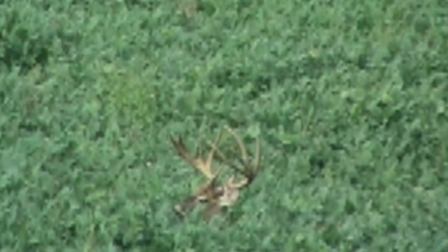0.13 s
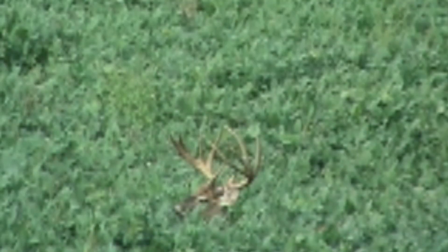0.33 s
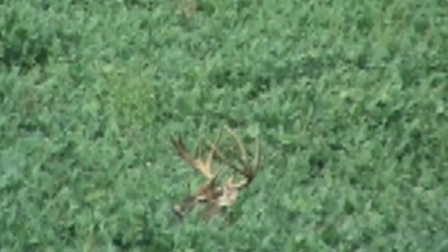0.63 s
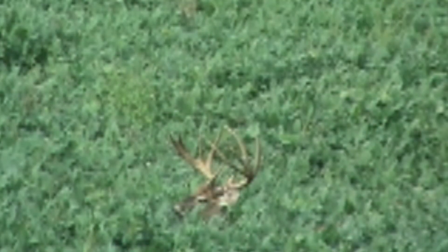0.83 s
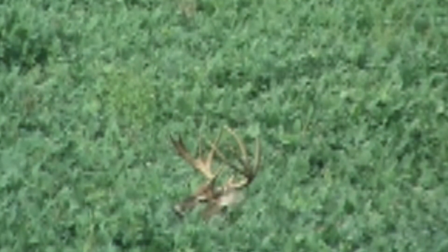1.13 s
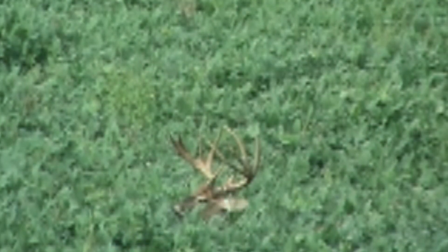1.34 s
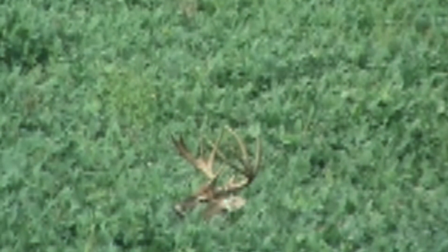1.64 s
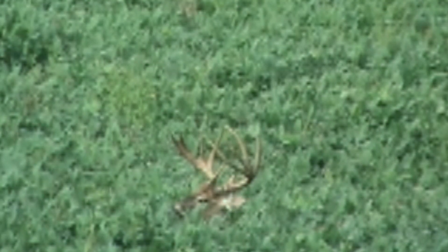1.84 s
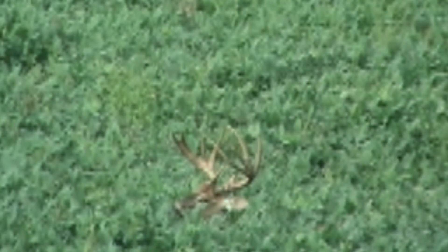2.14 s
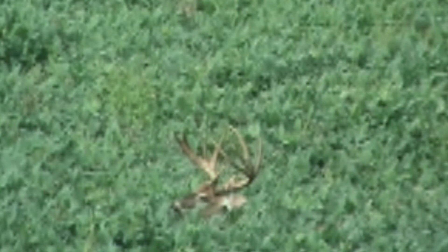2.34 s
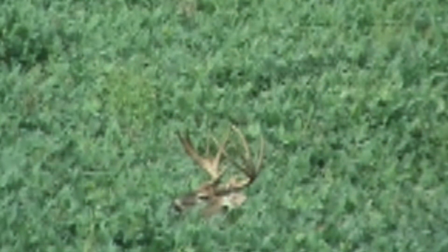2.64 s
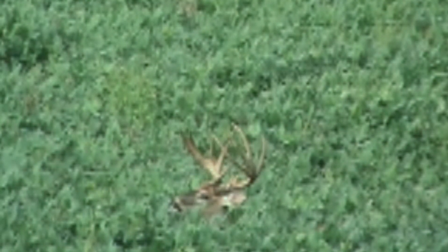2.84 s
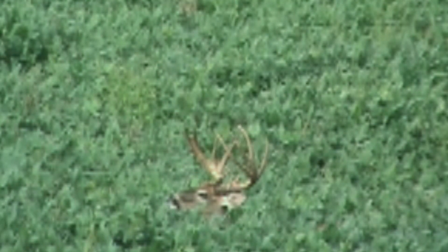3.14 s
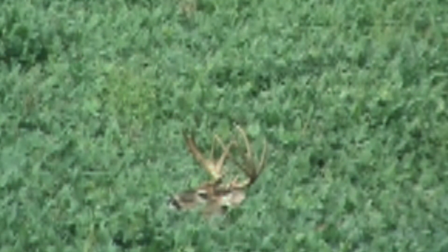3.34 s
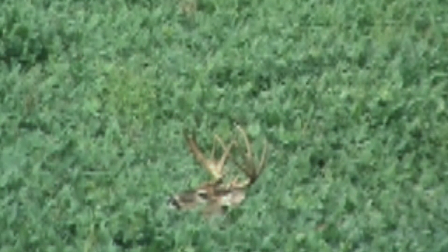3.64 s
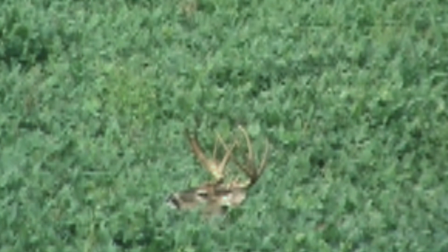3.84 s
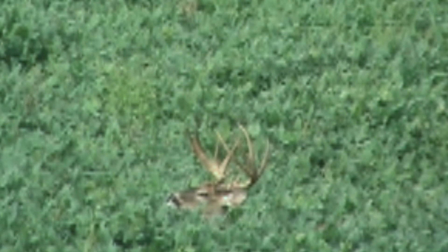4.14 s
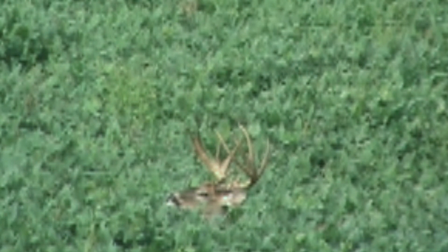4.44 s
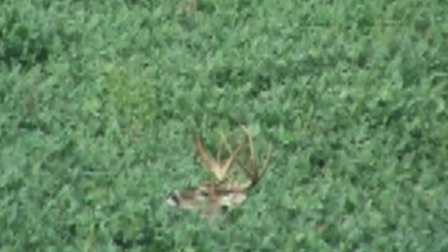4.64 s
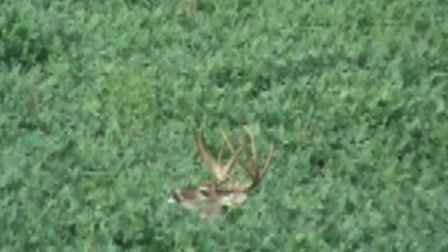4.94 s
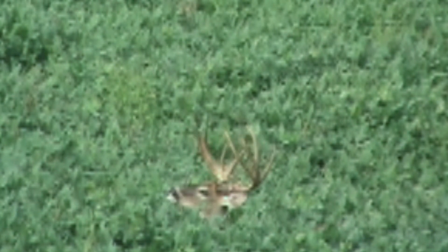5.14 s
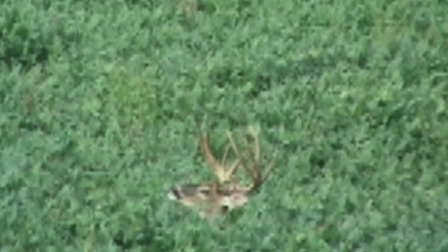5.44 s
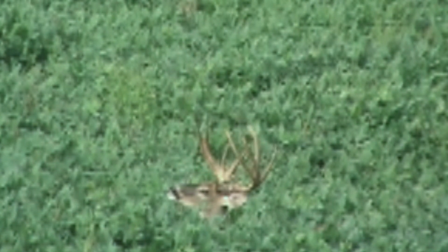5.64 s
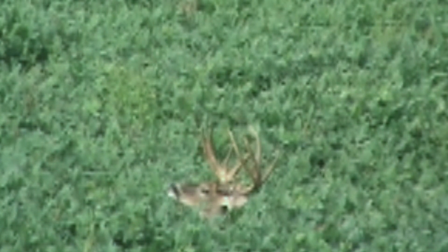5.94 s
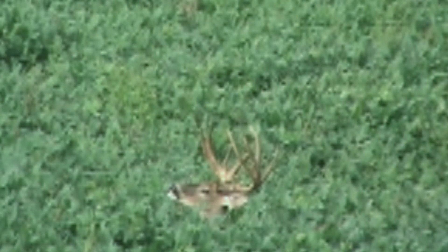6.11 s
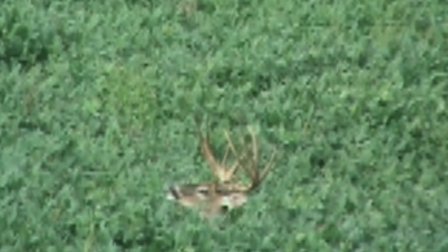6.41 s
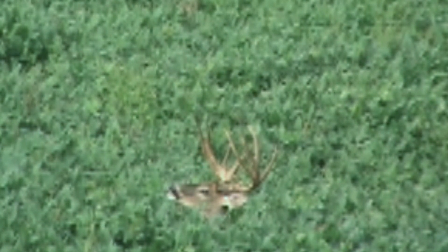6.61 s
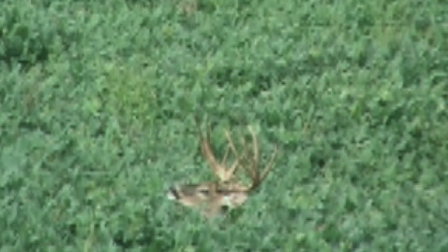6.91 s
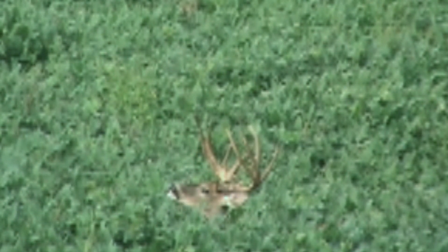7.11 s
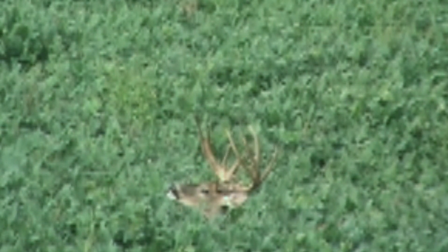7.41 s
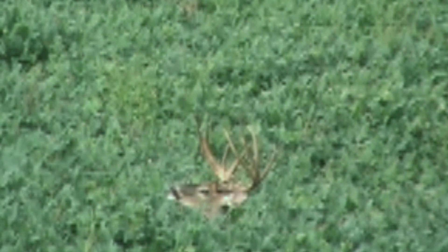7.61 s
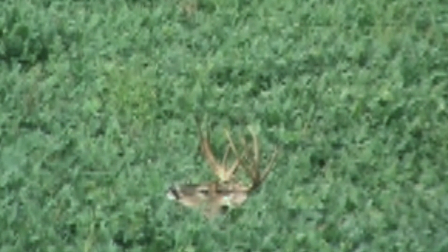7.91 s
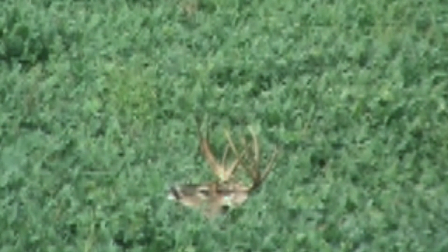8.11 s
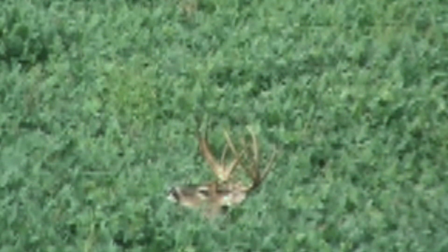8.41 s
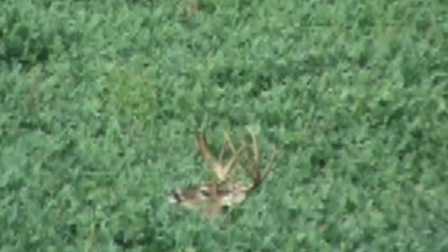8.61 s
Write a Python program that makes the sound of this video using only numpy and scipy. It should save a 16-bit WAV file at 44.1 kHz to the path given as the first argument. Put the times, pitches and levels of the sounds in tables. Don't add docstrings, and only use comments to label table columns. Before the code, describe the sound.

A dense, steady cricket trill near 7.8 kHz dominates an open leafy field where an antlered deer rests silently. A cicada buzz slowly swells beneath it, while katydids add thin high rasp. Very faint distant rumble and hum lie below. Two tiny ticks snap early, muffled animal calls come around two and four seconds, and weak bird notes appear at the end. One distant, grainy camera microphone, mono.

```python
import sys
import numpy as np
from scipy import signal
from scipy.fft import rfft, irfft, next_fast_len
from scipy.io import wavfile
from scipy.ndimage import uniform_filter1d, map_coordinates

SR = 44100
rng = np.random.default_rng(int(sys.argv[2]) if len(sys.argv) > 2 else 0)


def output_pcm(signal):
    pcm = np.clip(np.atleast_2d(signal).T, -1, 1) * 32767
    wavfile.write(sys.argv[1], SR, np.round(pcm).astype(np.int16))


def how_loud(loudness_db):
    steps = np.asarray(loudness_db, float) / 20
    return 10 ** steps


N = 386316
T = np.arange(N) / SR

# [t/s, level/dB]
CRICKET_LEVEL = [(0, -28), (1.5, -27.5), (3.6, -27.5), (3.95, -28.2), (5, -27.5), (5.7, -27.5),
                 (6.6, -27.5), (8, -27), (8.76, -28)]
# [f/Hz, level/dB per Hz]
WING_COLOUR = [(3410, -58), (5800, -34.5), (6570, -20.5), (6910, -16), (7000, -13.5), (7410, -4.5),
               (7780, 2.5), (8160, -3.5), (9350, -26.5), (9600, -24), (12500, -33.5), (21100, -120)]
# [t/s, level/dB]
CRICKET_SURGES = [(3.58, 1.5), (4.562, 2), (6.42, 2.8), (6.88, 2), (7.86, 2)]
# [t/s, level/dB]
CICADA_LEVEL = [(0, -49), (1.61, -44), (3.41, -39.5), (5.2, -38), (8.76, -36.5)]
# [t/s, rate/Hz]
CICADA_THROB = [(0, 6.1), (2.3, 6.9), (5, 6.97), (8.76, 7.3)]
# [f/Hz, level/dB per Hz]
TYMBAL_COLOUR = [(2800, -120), (3200, -29), (3900, -14.5), (4120, -9), (4450, -13), (4950, -11),
                 (5150, -12), (6300, -2), (7000, -2.5), (8600, -7), (9500, -15), (10500, -120)]
# [t/s, level/dB]
KATYDID_LEVEL = [(0, -35), (2.07, -37.5), (2.68, -36), (5.9, -35.5), (6.05, -35), (6.29, -37), (7.3, -36.5),
                 (7.71, -38), (8.76, -36)]
# [f/Hz, level/dB per Hz]
RASP_COLOUR = [(5530, -31.5), (9450, -9.5), (9720, -8.5), (13500, 0.5), (14700, 0), (15500, -5)]
# [t/s, peak level/dB, throb depth/dB]
FAR_CHORUS_LEVEL = [(0, -65, 5), (1.5, -61.5, 11), (2.9, -64, 5), (3.4, -67, 0), (4.2, -63.5, 6),
                    (6.2, -63, 4), (7, -65, 1), (8.76, -61, 2)]
# [f/Hz, level/dB per Hz]
AIR_COLOUR = [(22, -4), (41, -6), (48, -8), (65, -9.5), (95, -4.5), (140, 2), (230, -1), (330, -5),
              (620, -9.5), (730, -15.5), (1000, -18), (1300, -24), (2400, -26), (3200, -24.5), (6000, -20)]
# [t/s, level/dB]
MAINS_LEVEL = [(0, -57), (.7, -49.5), (2.2, -50.5), (2.8, -56), (3.3, -49), (4.2, -51), (4.5, -59),
               (4.9, -52), (6.5, -46), (7.5, -50.5), (8.3, -46.5)]
# [f/Hz, level/dB per Hz]
SHED_COLOUR = [(450, -60), (530, -6.5), (590, 1.5), (650, -8), (720, -55)]
# [t/s, level/dB]
SHED_LEVEL = [(0, -56.5), (1.3, -61), (3.5, -64), (7, -68), (7.4, -59), (7.8, -64)]
# [t/s, length/s, f/Hz, level/dB, tilt/dB per overtone]
ANIMAL_CALLS = [
    (-.12, .4, 595, -49, -22),
    (1.79, .19, 512, -65, 1),
    (1.99, .13, 515, -61, -5),
    (2.12, .18, 472, -56, -6),
    (4.17, .16, 560, -49, -11),
]
# [t/s, level/dB, centre f/Hz, t60/s]
DRY_TICKS = [
    (.537, -50.5, 2100, .03),
    (.562, -49, 3400, .045),
    (.62, -55, 2900, .05),
    (.73, -56, 2900, .05),
    (7.751, -41.5, 4000, .025),
]
# [t/s, f/Hz, level/dB]
BIRD_NOTES = [(7.797, 2125, -57), (7.865, 2325, -59), (8.093, 2050, -56), (8.005, 2600, -63),
              (8.065, 2150, -63), (8.128, 2100, -61), (8.235, 2275, -60), (8.162, 2275, -59),
              (8.195, 2030, -58), (8.297, 2350, -66), (8.365, 2285, -60), (8.397, 2200, -59),
              (8.597, 2390, -68), (8.63, 1975, -61), (8.665, 2300, -65), (8.727, 2360, -64)]
# [band top f/Hz, step level/dB, frame scatter/dB]
GRAIN_STEPS = [(3400, -70, 2), (5500, -47, 3), (6900, -43, 3), (7580, -36, 3), (8270, -28, 3),
               (8960, -25, 3), (9650, -24, 4), (10340, -27, 4.5), (11025, -28, 4), (12400, -28, 3.5),
               (13780, -26.5, 3.5), (14470, -25.5, 4), (15160, -24.5, 4.5), (15740, -24.5, 5)]


def unit(x):
    return x / np.sqrt(np.mean(x ** 2) + 1e-20)


def curves(rows):
    s, *cols = np.transpose(rows)
    return [np.interp(T, s, c) for c in cols]


def wobble(rate):
    knots = rng.standard_normal(int(N * rate / SR) + 4)
    return map_coordinates(knots, [T * rate])


def noise():
    return rng.standard_normal(N)


def sine(hz):
    return np.sin(2 * np.pi * np.cumsum(hz) / SR)


def coloured(x, spectrum):
    m = next_fast_len(N + 8192)
    f, db = np.transpose(spectrum)
    log_hz = np.log(np.fft.rfftfreq(m, 1 / SR) + 1)
    gain = how_loud(np.interp(log_hz, np.log(f + 1), db))
    return unit(irfft(rfft(x, m) * gain, m)[:N])


def echoes(x, t60, wet_db):
    t = T[:SR // 2]
    tail = rng.standard_normal(len(t)) * how_loud(-60 * t / t60)
    tail /= np.linalg.norm(tail)
    return x + how_loud(wet_db) * signal.fftconvolve(x, tail)[:N]


def note(s, length, hz0, hz1, partials_db, rough):
    u = np.clip((T - s) / length, 0, 1)
    hz = (hz0 + (hz1 - hz0) * u) * (1 + rough * wobble(90))
    phase = 2 * np.pi * np.cumsum(hz) / SR
    voice = sum(how_loud(db) * np.sin((k + 1) * phase) for k, db in enumerate(partials_db))
    return np.sqrt(np.sin(np.pi * u) + 1e-12) * voice


def chorus_db():
    surge_s, flutter_db, flutter_rate, fade_s = 0.021, 1.03, 26, 2.2
    surges = sum(db * np.exp(-((T - s) / surge_s) ** 2) for s, db in CRICKET_SURGES)
    flutter = flutter_db * np.exp(-(T / fade_s) ** 2) * wobble(flutter_rate)
    return curves(CRICKET_LEVEL)[0] + flutter + surges


def crickets(count=44):
    near = np.zeros(N)
    for hz in np.linspace(6900, 9000, count):
        strokes = np.cumsum(rng.uniform(50, 95) * (1 + .05 * wobble(8))) / SR
        part = strokes % 1
        start = 2 * np.pi * rng.random(1200)[strokes.astype(int) % 1200]
        phase = 2 * np.pi * np.cumsum(hz + 260 * (.35 - part)) / SR + start
        stroke = np.sin(np.pi * np.clip(part / 0.64, 0, 1)) ** 2
        singer_db = rng.normal(0, 1.5) + 3.0 * wobble(3.1)
        near += how_loud(singer_db) * stroke * np.sin(phase)
    chorus = unit(near) * np.sqrt(count / 400) * how_loud(-1.5) + noise()
    return how_loud(chorus_db() + 0.92) * coloured(chorus, WING_COLOUR)


def cicada():
    clicks = np.zeros(N)
    click_count = np.cumsum(900 * (1 + .3 * wobble(300))) / SR
    at = np.flatnonzero(np.diff(np.floor(click_count)))
    clicks[at] = rng.standard_normal(len(at))
    buzz = unit(clicks) + 1.62 * noise()
    throb = 1 + 0.17 * np.cos(2 * np.pi * np.cumsum(curves(CICADA_THROB)[0]) / SR - 1.1)
    in_tree = echoes(throb * buzz, t60=.7, wet_db=-5.5)
    return how_loud(curves(CICADA_LEVEL)[0] + 3.5) * coloured(in_tree, TYMBAL_COLOUR)


def katydids():
    strokes = 1 + 0.11 * np.cos(2 * np.pi * np.cumsum(41.0 + 0.35 * wobble(0.99)) / SR)
    unsteady = how_loud(0.3 * wobble(7.2) + 0.38 * wobble(20))
    rasp = strokes * unsteady * noise()
    return how_loud(curves(KATYDID_LEVEL)[0] + 0.24) * coloured(rasp, RASP_COLOUR)


def far_chorus():
    band = [(1500, -120), (1700, -12), (1800, -1), (1900, -2), (2000, -5), (2200, -120)]
    throb_rate, peak_s = 3.05, 3.53
    peak_db, depth_db = curves(FAR_CHORUS_LEVEL)
    dip = np.sin(np.pi * throb_rate * (T - peak_s)) ** 2
    return how_loud(peak_db - depth_db * dip - 3.0) * coloured(noise(), band)


def rumble():
    level_db = -45 - 0.07 * T + 1.5 + 0.46 * wobble(4)
    return how_loud(level_db) * coloured(noise(), AIR_COLOUR)


def hum_line(hz, db):
    return np.sqrt(2) * how_loud(db - 3) * sine(hz + 0.24 * wobble(2.96))


def mains_hum():
    return hum_line(120.4, curves(MAINS_LEVEL)[0] + 1.9 * wobble(5))


def engine():
    beat_rate, peak_s, depth_db, fade_s = 1.34, 2.42, 2.5, 3
    beat_db = depth_db * np.exp(-T / fade_s) * np.cos(2 * np.pi * beat_rate * (T - peak_s))
    return hum_line(53.1, -58.5 + beat_db)


def shed():
    patch_db = 2.5 * wobble(7)
    return how_loud(curves(SHED_LEVEL)[0] + patch_db) * coloured(noise(), SHED_COLOUR)


def far_animal():
    sag_hz_per_s, throat_db = 190, np.array([0, 4, 0])
    calls = np.zeros(N)
    for s, length, hz, db, tilt in ANIMAL_CALLS:
        partials_db = db + tilt * np.arange(3) + throat_db
        calls += note(s, length, hz, hz - sag_hz_per_s * length, partials_db, rough=.027)
    return echoes(calls, t60=.6, wet_db=-5)


def ticks():
    out = np.zeros(N)
    for s, db, hz, t60 in DRY_TICKS:
        body = [(hz / 3, -40), (hz * .55, -4), (hz, 0), (hz * 1.5, -4), (hz * 2.5, -40)]
        decay = how_loud(db - 60 * np.clip(T - s, 0, 1) / t60) * (T > s)
        out += decay * coloured(noise(), body)
    return out


def bird():
    notes = np.zeros(N)
    for s, hz, db in BIRD_NOTES:
        glide_hz = 30.4 * rng.standard_normal()
        notes += note(s, 0.016, hz - glide_hz, hz + glide_hz, [db], rough=.006)
    return echoes(notes, t60=.2, wet_db=-10)


def spectral_grain(x, size=1024, lead=570):
    n, k = np.arange(2 * size), np.arange(size)
    window = np.sin(np.pi * (n[:, None] + .5) / (2 * size))
    cosines = np.cos(np.pi / size * np.outer(n + .5 + size / 2, k + .5))
    basis = window * cosines * np.sqrt(2 / size)
    count = N // size + 3
    blocks = np.pad(x, (2 * size - lead, (count - 1) * size + lead - N)).reshape(-1, size)
    lines = np.hstack([blocks[:-1], blocks[1:]]) @ basis
    top_hz, step_db, scatter_db = np.transpose(GRAIN_STEPS)
    bands = len(top_hz)
    band = np.searchsorted(top_hz, (k + .5) * SR / 2 / size)
    shared = .5 * rng.standard_normal((count, 1))
    swing = uniform_filter1d(shared + rng.standard_normal((count, bands)), size=5, axis=0)
    step = how_loud(step_db + scatter_db * swing)[:, np.minimum(band, bands - 1)]
    rounded = np.floor(np.abs(lines) / step + 0.38) * step
    kept = np.sign(lines) * rounded * (band < bands)
    halves = kept @ basis.T
    overlapped = halves[1:, :size] + halves[:-1, size:]
    return overlapped.ravel()[size - lead:][:N]


def scene():
    insects = crickets() + cicada() + katydids() + far_chorus()
    farm = rumble() + mains_hum() + engine() + shed()
    mono = insects + farm + far_animal() + ticks() + bird()
    return np.array([mono, mono])


def roll_off(x):
    return signal.sosfilt(signal.butter(12, 16650, fs=SR, output="sos"), x)


def record(dry):
    whistle = how_loud(-65) * np.sin(2 * np.pi * 15730 * T)
    grainy = spectral_grain(dry[0] + whistle)
    return roll_off(np.array([grainy, grainy]))


dry = scene()
out = record(dry)
output_pcm(out)
```